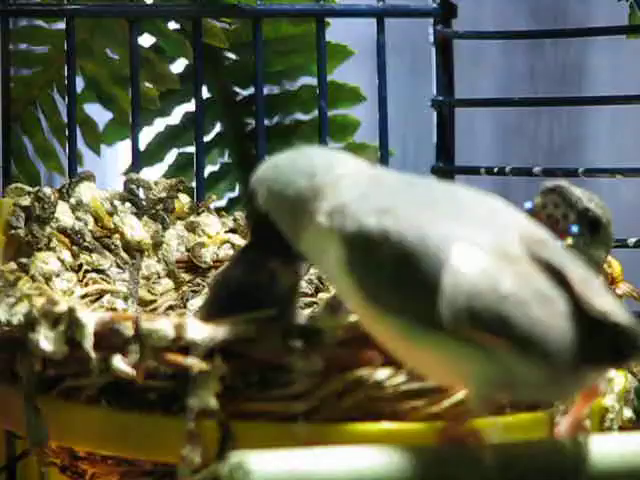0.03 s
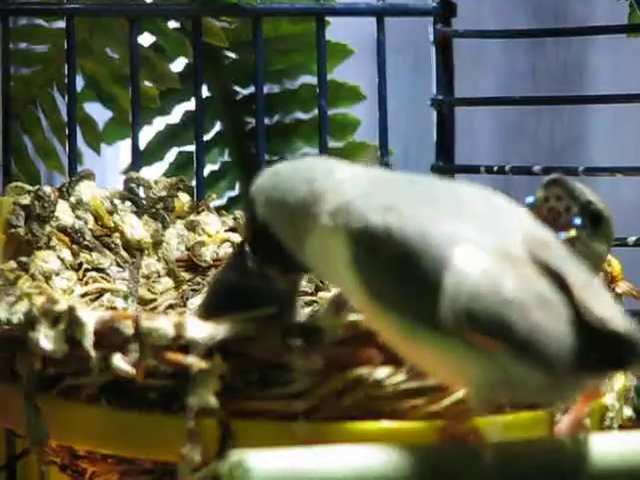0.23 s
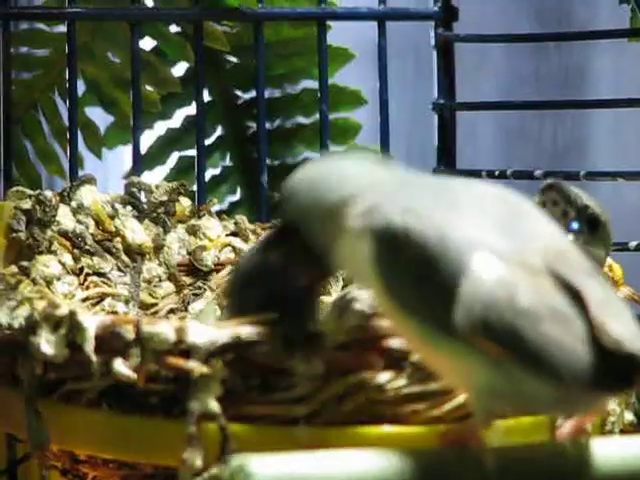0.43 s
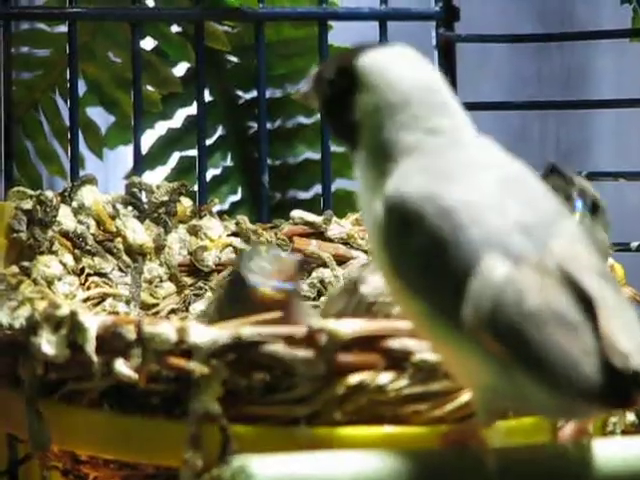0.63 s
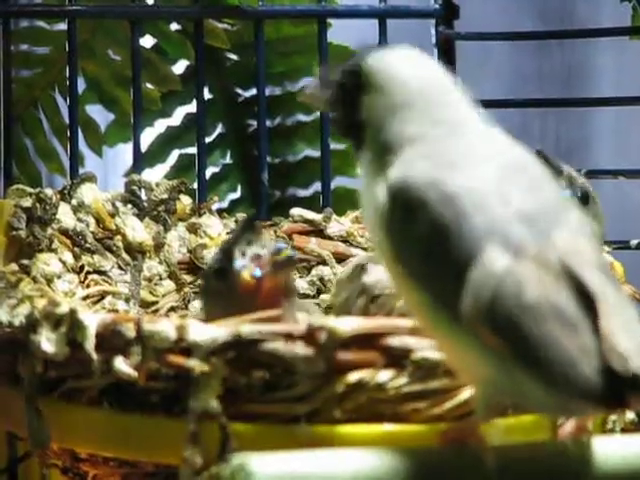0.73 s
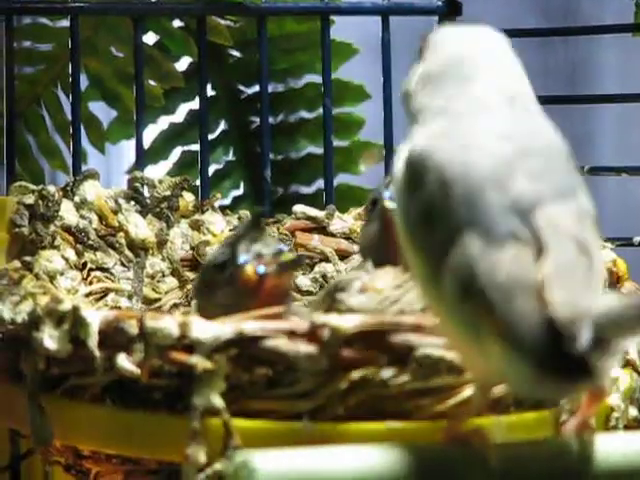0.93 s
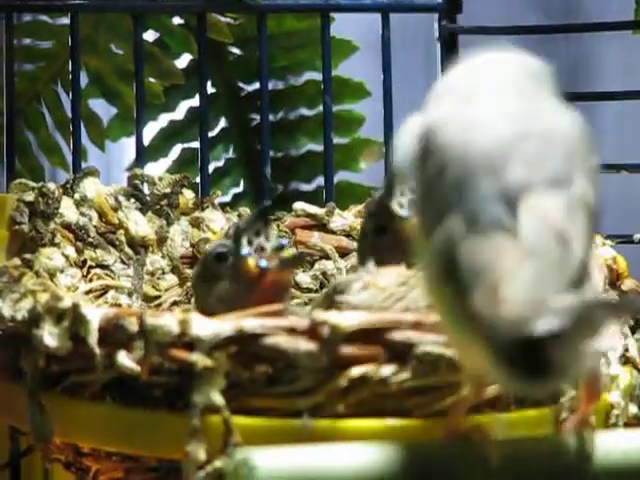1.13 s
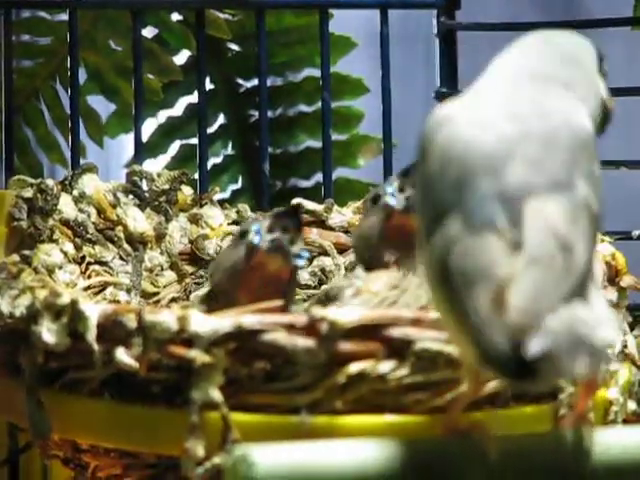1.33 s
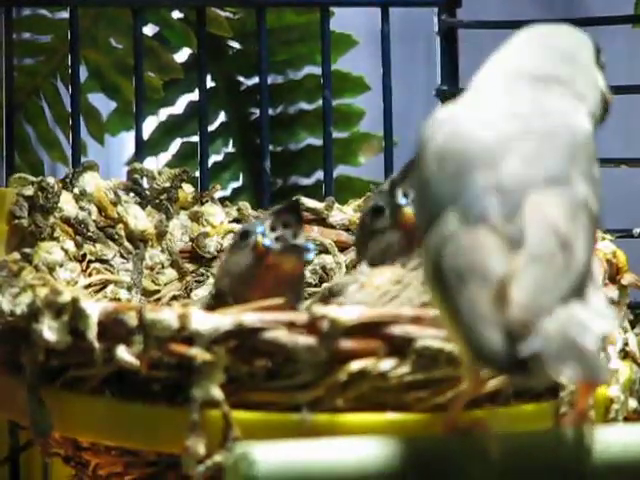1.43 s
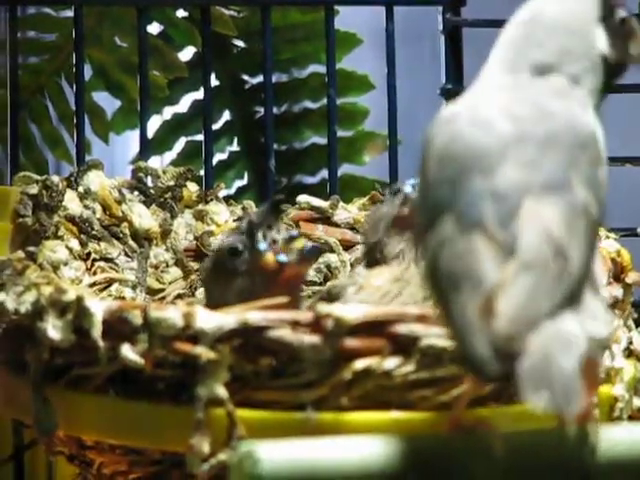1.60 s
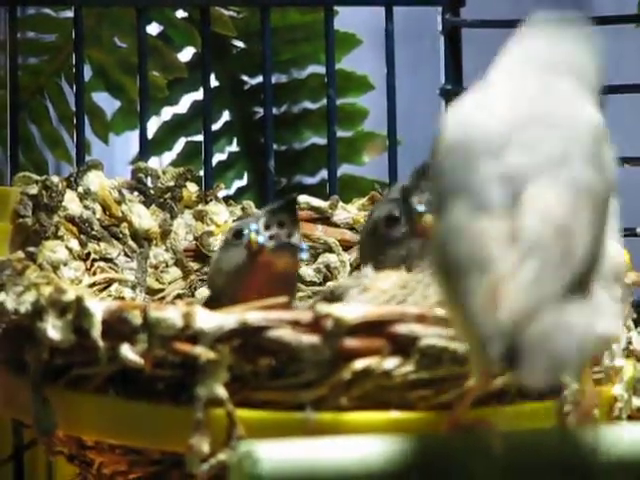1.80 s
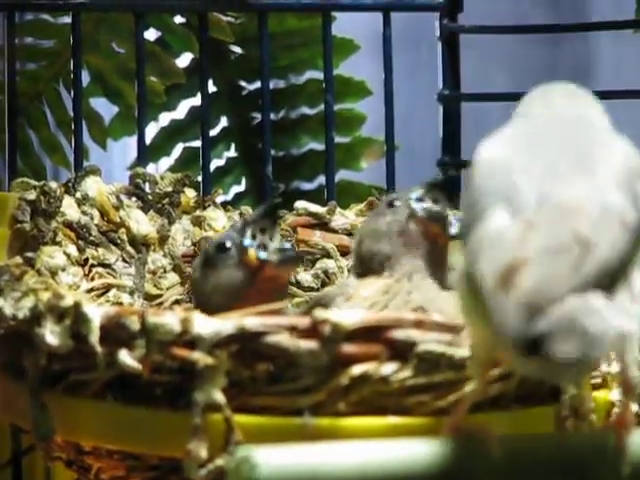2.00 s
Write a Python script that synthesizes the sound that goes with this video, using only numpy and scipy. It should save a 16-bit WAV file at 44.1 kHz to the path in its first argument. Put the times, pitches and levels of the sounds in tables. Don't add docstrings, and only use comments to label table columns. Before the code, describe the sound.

Close up in an indoor cage, a single chick cheeps sharply in quick upward whistles, then two chicks cry over each other, harsher and denser, with short cage ring and quiet room air.

```python
import sys
import numpy as np
from scipy import signal
from scipy.fft import rfft, irfft, next_fast_len
from scipy.io import wavfile
from scipy.ndimage import uniform_filter1d, map_coordinates

SR = 44100
rng = np.random.default_rng(int(sys.argv[2]) if len(sys.argv) > 2 else 0)


def generate_wav(signal):
    frames = np.transpose(np.atleast_2d(signal))
    scaled = np.clip(frames, -1, 1) * 32767
    pcm = np.round(scaled).astype(np.int16)
    wavfile.write(sys.argv[1], SR, pcm)


def invert_db(x):
    u = np.asarray(x, float) / 20
    return 10 ** u


N = 90581

# pitch_hz, level_db
HUM_PARTIALS = [(59.5, -78), (119.5, -79.5), (344.5, -90.5), (479.1, -62.5), (597.5, -74), (629.8, -68),
                (802.1, -78), (850.6, -74.5)]
# freq_hz, level_db
AIR_SPECTRUM = [(15, -49), (35, -34.5), (200, -5), (648, -6.5), (1500, -11), (2560, -16.5), (6920, -23),
                (15500, -35)]
# time_s, level_db, centre_hz, length_s
CLAW_SCRAPES = [
    (0.336, -48.5, 3440, 0.0069),
]
# freq_hz, gain_db
FIRST_THROAT = [(2000, -14.5), (4000, -7), (6000, 9.5), (8000, 1.5), (9500, -3), (12000, -17), (16000, -29),
                (20000, -51)]
# freq_hz, gain_db
SECOND_THROAT = [(2000, -9), (3700, -9), (4600, -8), (6000, -13), (8300, 2), (10700, -8.5), (12200, -21.5),
                 (20000, -29)]
# time_s, pitch_hz, level_db, roughness_0_1, flutter_0_1
FIRST_ALONE = [
    [(0, 5815, -34, 0.2, 0.7), (.06, 5950, -51, 0.15, .6), (.075, 5900, -71, .1, .5)],
    [(.135, 3260, -62, 0.2, 0.1), (.141, 3540, -35, 0.2, 0.2), (.158, 3950, -23.5, 0.31, 0.2),
     (.18, 4060, -20, 0, 0.3), (.192, 4536, -22.5, 0.48, 0.65), (.202, 5445, -27, 0.04, 0.5),
     (.228, 5906, -26, 0.16, 0.1), (.245, 5950, -30, 0.13, 0.1), (.254, 5880, -46, 0.2, 0.4)],
    [(.373, 3530, -29, 0, 0.1), (.379, 4070, -22.5, 0.08, 0.05), (.399, 4360, -26, 0.25, 0),
     (.403, 3990, -13.5, 0, 0.07), (.42, 4216, -24.5, 0.22, 0.3), (.43, 5155, -25, .4, 0.74),
     (.466, 5893, -26.5, 0.04, 0.17), (.486, 5853, -24.5, 0.02, 0.48), (.494, 5700, -58, 0, .5)],
    [(.614, 3540, -39, 0.2, 0.08), (.62, 4116, -21.5, 0.1, 0.05), (.635, 4300, -24.5, 0.18, 0.25),
     (.645, 3904, -18.5, 0.1, 0.2), (.662, 4250, -20, 0.1, 0.39), (.674, 5300, -23.5, 0.15, 0.74),
     (.7, 5753, -24, 0.11, 0.5), (.726, 5800, -26.5, 0.17, 0.34), (.733, 5270, -47, .1, .5)],
]
# time_s, pitch_hz, level_db, roughness_0_1, flutter_0_1
FIRST_RIVAL = [
    [(.955, 3700, -43, 0.2, 0), (.96, 4000, -15.5, 0.07, 0.08), (.98, 4028, -15, .02, 0.07),
     (1.0, 4033, -16.5, 0.13, 0.38), (1.035, 3860, -23.5, 0.23, 0.5), (1.055, 4700, -34, 0.4, 0.7),
     (1.07, 5200, -25.5, 0.03, 0.6), (1.088, 5250, -24, 0.31, 0.06), (1.098, 3950, -59, 0.2, 0.3)],
    [(1.156, 3270, -38, 0.2, 0.1), (1.166, 3950, -22.5, 0.11, 0.08), (1.19, 4050, -16, 0.1, 0.11),
     (1.212, 4090, -13.5, 0.11, 0.42), (1.24, 4950, -27.5, 0.3, 0.6), (1.28, 5215, -24.5, 0.13, 0.06),
     (1.293, 4780, -28.5, 0.4, 0.6), (1.302, 3850, -47, 0.6, .4)],
    [(1.418, 3590, -20, 0.3, 0), (1.426, 4000, -17, 0.1, .1), (1.448, 4072, -17, 0.19, 0.28),
     (1.465, 4680, -23, 0.5, 0.5), (1.51, 5070, -22.5, 0.3, 0), (1.535, 4980, -24.5, 0.65, 0),
     (1.546, 4160, -26, 0.7, 0.1)],
    [(1.64, 3579, -36, 0.14, .1), (1.65, 3960, -21.5, 0.23, 0.18), (1.685, 4090, -15.5, 0.22, 0.17),
     (1.705, 4906, -26, 0.63, 0.1), (1.74, 5170, -23.5, 0.5, 0), (1.76, 4320, -34, 0.6, .4)],
    [(1.903, 3486, -22, 0, 0), (1.912, 3890, -17, 0.25, 0.16), (1.965, 4150, -17.5, 0.13, 0),
     (2.0, 4447, -24, 0.43, 0.55), (2.025, 4920, -23, 0.65, 0.54), (2.06, 5250, -31, .4, 0.1)],
]
# time_s, pitch_hz, level_db, roughness_0_1 (also drives flutter)
SECOND_JOINS = [
    [(.787, 2170, -26, .2), (.793, 2760, -37, 0.25), (.816, 2763, -31.5, 0.37), (.819, 3270, -20.5, 0.1),
     (.838, 3726, -18.5, 0.03), (.86, 3898, -19, 0.15), (.884, 4053, -17, 0.29), (.889, 2750, -31, 0.3),
     (.902, 1930, -30, 0.16)],
    [(.911, 3460, -37, 0.2), (.916, 3910, -21, 0.14), (.93, 3520, -26.5, 0.3), (.955, 3610, -15.5, 0.1),
     (.98, 3880, -25.5, 0.42), (1.0, 3500, -35, 0.45)],
    [(1.0, 3008, -43, 0.4), (1.012, 3140, -26, 0.2), (1.022, 3546, -15.5, 0.11), (1.036, 3800, -23.5, 0.2),
     (1.041, 4300, -12, 0.17), (1.062, 4510, -20, 0.24), (1.092, 4410, -21.5, 0.04),
     (1.099, 2920, -28, 0.17), (1.107, 2200, -49, 0.2)],
    [(1.185, 2657, -33, 0.4), (1.2, 3400, -20, 0.35), (1.22, 4090, -17, 0.3), (1.25, 4155, -16, 0.22),
     (1.28, 4060, -19.5, 0.3), (1.293, 4350, -20, 0.25), (1.297, 2910, -29, 0.4), (1.305, 2200, -48, 0.4)],
]
# time_s, pitch_hz, level_db, roughness_0_1 (also drives flutter)
SECOND_GOES_ON = [
    [(1.388, 2650, -45, 0.4), (1.396, 3100, -29.5, 0.76), (1.41, 3500, -18, .4), (1.43, 3760, -21.5, 0.11),
     (1.455, 4257, -15.5, 0.09), (1.48, 4297, -17, 0.3), (1.535, 4320, -28.5, 0.12), (1.548, 3770, -44, .5)],
    [(1.597, 2990, -51, 0.3), (1.605, 3190, -30.5, 0.49), (1.625, 3406, -22.5, 0.04),
     (1.65, 3930, -18.5, .25), (1.68, 4356, -20.5, 0.28), (1.74, 4440, -23.5, 0.22),
     (1.757, 4180, -24, 0.2), (1.768, 3433, -33, .3)],
    [(1.802, 2520, -55, 0.42), (1.81, 2894, -36, 0.4), (1.819, 2864, -34, 0.26), (1.822, 3305, -23.5, .03),
     (1.842, 3650, -23.5, 0.11), (1.856, 4000, -20, 0.13), (1.895, 4370, -15.5, 0.27),
     (1.903, 3676, -18.5, 0.33), (1.912, 2880, -42, 0.4)],
    [(1.9, 3322, -20, 0.4), (1.912, 3690, -21.5, 0.03), (1.97, 3822, -21, 0.22), (2.0, 3960, -18.5, 0.03),
     (2.025, 3750, -16.5, 0.42), (2.035, 3070, -46, 0)],
    [(2.025, 3060, -45, .3), (2.035, 3344, -25.5, 0.15), (2.06, 3740, -17, 0)],
]


def along(table, hz):
    freq_hz, db = np.array(table).T
    return np.interp(np.log(np.maximum(hz, 1)), np.log(freq_hz), db)


def shaped(gain):
    size = next_fast_len(N)
    spectrum = rfft(rng.standard_normal(size)) * gain(np.fft.rfftfreq(size, 1 / SR))
    noise = irfft(spectrum, size)[:N]
    return noise / noise.std()


def walk(rate_hz):
    return shaped(lambda f: 1 / (1 + (f / rate_hz) ** 4))


def air():
    t = np.arange(N) / SR
    mid = shaped(lambda f: invert_db(along(AIR_SPECTRUM, f))) * invert_db(0.8 * walk(3))
    side = shaped(lambda f: invert_db(along(AIR_SPECTRUM, f)) * np.clip(f / 1500, 0.07, 0.8)) * invert_db(-12.5)
    hum = np.zeros(N)
    for pitch_hz, level_db in HUM_PARTIALS:
        level = 1.6 * invert_db(level_db + 4.6 * walk(9.8))
        hum += level * np.sin(2 * np.pi * pitch_hz * t + 2.3 * walk(9))
    return invert_db(-55.5) * (mid + side * np.array([[1], [-1]])) + hum


def echoes(x, t60_s, delay_s):
    t = np.arange(SR // 2) / SR
    shared = 0.15
    noise = rng.standard_normal((3, len(t)))
    scatter = np.sqrt(shared) * noise[0] + np.sqrt(1 - shared) * noise[1:]
    tail = scatter * invert_db(-60 * t / t60_s) * (t > delay_s)
    tail /= np.sqrt(np.mean(np.sum(tail ** 2, axis=1)))
    return signal.fftconvolve(x[None], tail, axes=1)[:, :N]


def place(x, pan_db, lag_s):
    def late(delay_s):
        return map_coordinates(x, [np.arange(N) - delay_s * SR], mode="nearest")

    left = late(lag_s / 2) * invert_db(pan_db / 2)
    right = late(-lag_s / 2) * invert_db(-pan_db / 2)
    return np.array([left, right])


def scrapes():
    t = np.arange(N) / SR
    out = np.zeros(N)
    for time_s, level_db, centre_hz, length_s in CLAW_SCRAPES:
        grit = shaped(lambda f: np.exp(-((f - centre_hz) / 700) ** 2))
        out += invert_db(level_db) * np.exp(-((t - time_s) / length_s) ** 2) * grit
    return out


def chick(cries, throat, flutter_hz, swing_rad, throb, jitter_rad, wobble, quaver_hz, quaver,
          patchy_db, breath_db):
    out, t = np.zeros(N), np.arange(N) / SR
    flutter = 2 * np.pi * np.cumsum(flutter_hz * (1 + 0.04975 * walk(29.8))) / SR
    drift = wobble * walk(86) + quaver * np.sin(2 * np.pi * quaver_hz * t + 1.68 * walk(36))
    jitter, patch_db = jitter_rad * walk(530), patchy_db * walk(168)
    breath = shaped(lambda f: invert_db(0.5 * along(throat, f)) * (f / 2500) ** 2 / (1 + (f / 2500) ** 2))
    for cry in map(np.array, cries):
        time_s = np.maximum.accumulate(cry[:, 0])
        at = np.arange(max(int(time_s[0] * SR), 0), min(int(time_s[-1] * SR), N))

        def glide(column):
            return uniform_filter1d(np.interp(t[at], time_s, cry[:, column]), size=80)

        hz, db = glide(1), glide(2)
        rough = np.clip(glide(3), 0, 1)
        beat = np.clip(glide(-1), 0, 1) ** 0.79
        bent_hz = hz * (1 + np.minimum(0.13 + 5 * rough, 1) * drift[at])
        phase = 2 * np.pi * np.cumsum(bent_hz) / SR
        phase += beat * swing_rad * np.sin(flutter[at]) + rough * jitter[at]
        pulse = (1 + beat * throb * np.cos(flutter[at] + 1)) * invert_db(np.sqrt(rough) * patch_db[at])
        tone = np.zeros(len(at))
        for k in range(1, 6):
            tone += invert_db(along(throat, k * hz)) * np.sin(k * phase) * (k * hz < 0.45 * SR)
        voice = tone + invert_db(breath_db) * (0.49 + rough) * breath[at]
        out[at] += signal.windows.tukey(len(at), 0.06) * invert_db(db) * pulse * voice
    return out


def scene():
    first = chick(FIRST_ALONE + FIRST_RIVAL, FIRST_THROAT, flutter_hz=620, swing_rad=1.15, throb=0.8,
                  jitter_rad=2.1, wobble=0.0083, quaver_hz=155.5, quaver=0.017,
                  patchy_db=4.0, breath_db=-12.5)
    second = chick(SECOND_JOINS + SECOND_GOES_ON, SECOND_THROAT, flutter_hz=488.5, swing_rad=1.2, throb=0.72,
                   jitter_rad=2.0, wobble=0.01087, quaver_hz=142.4, quaver=0.035,
                   patchy_db=4, breath_db=-17.5)
    claw = scrapes()
    nest = first + second + claw
    direct = place(first, 0.61, -1.3e-5) + place(second + claw, 1.3, 1.3e-5)
    background = air()
    cage = invert_db(-4.5) * echoes(nest, t60_s=0.062, delay_s=0.0008)
    room = invert_db(-10.5) * echoes(nest, t60_s=0.19, delay_s=0.012)
    return direct + background + cage + room


def roll_off(x):
    return signal.sosfilt(signal.butter(12, 15690, fs=SR, output="sos"), x)


def record(dry):
    start_s = 0.072
    mix = dry * (np.arange(N) > start_s * SR)
    return roll_off(mix)


dry = scene()
out = record(dry)
generate_wav(out)
```